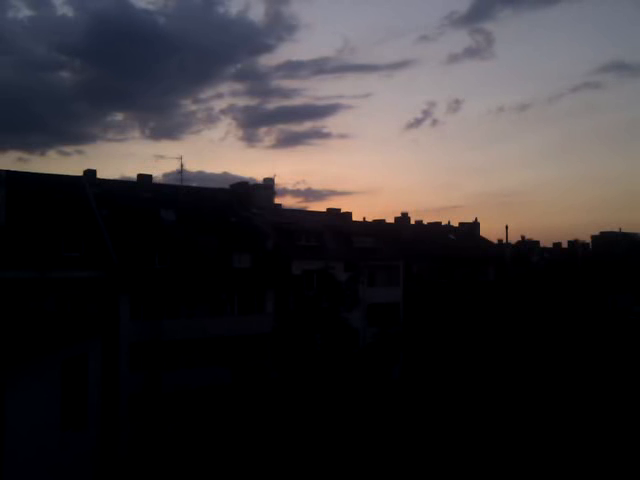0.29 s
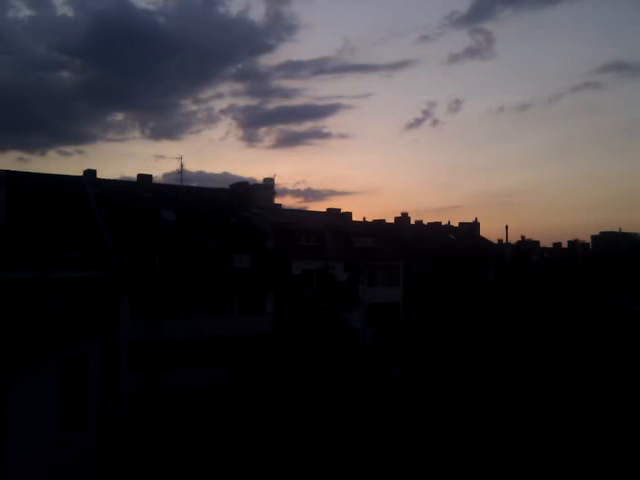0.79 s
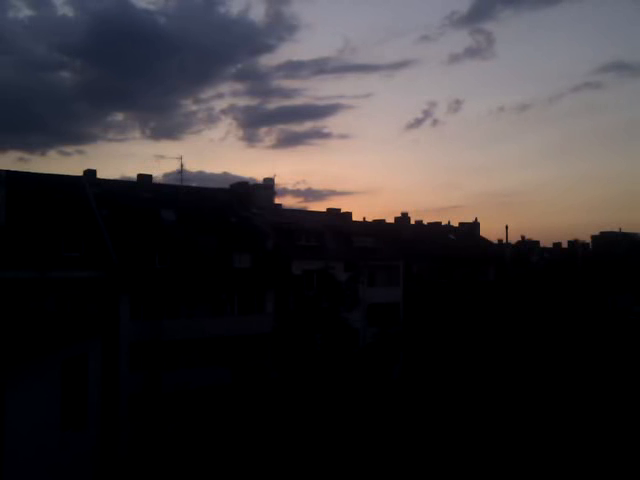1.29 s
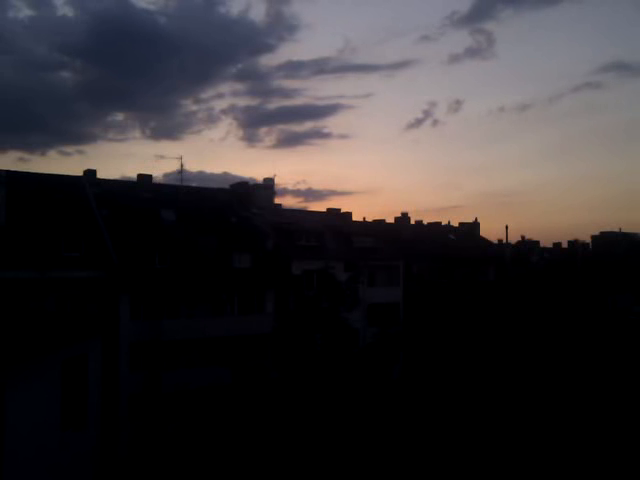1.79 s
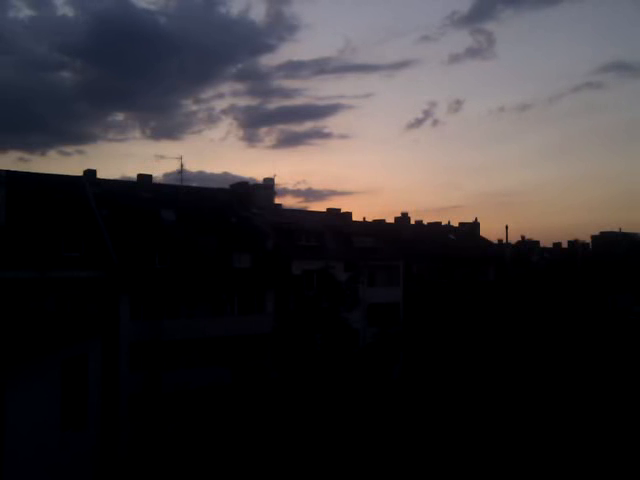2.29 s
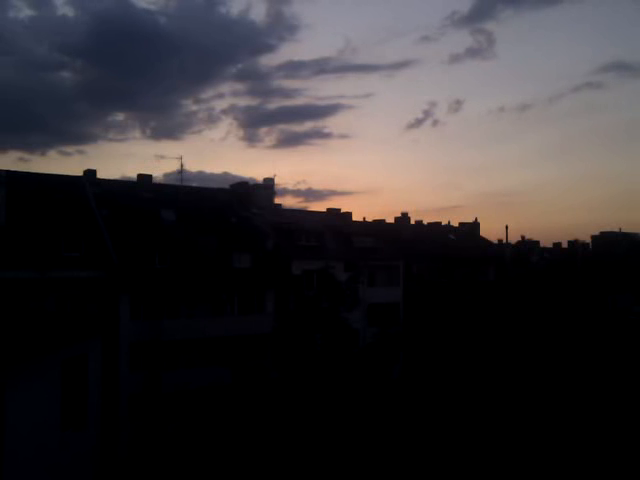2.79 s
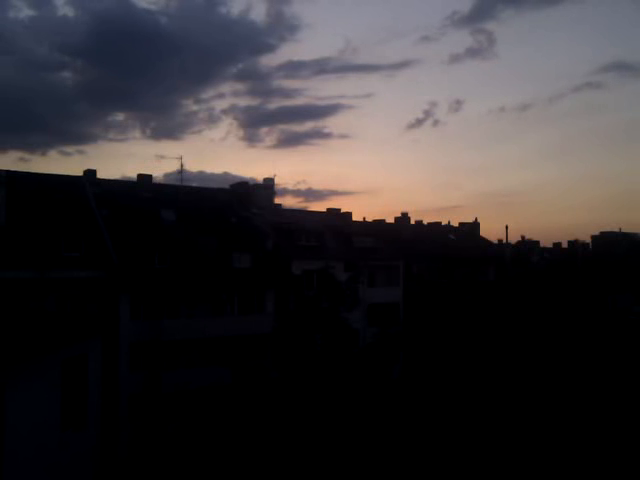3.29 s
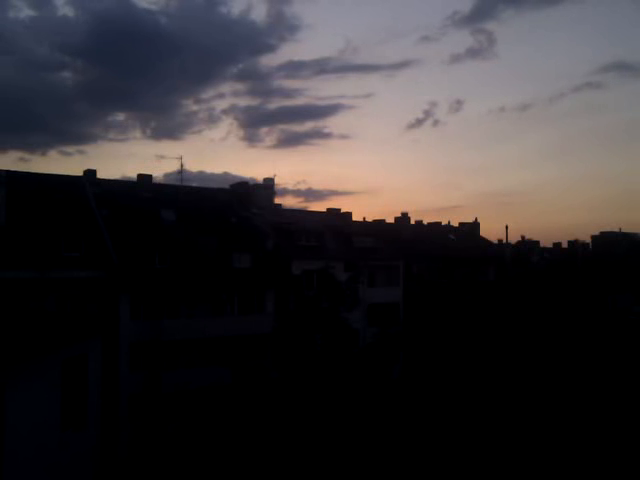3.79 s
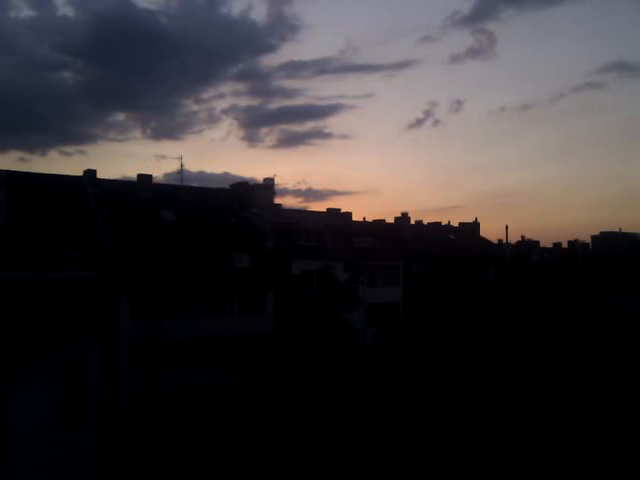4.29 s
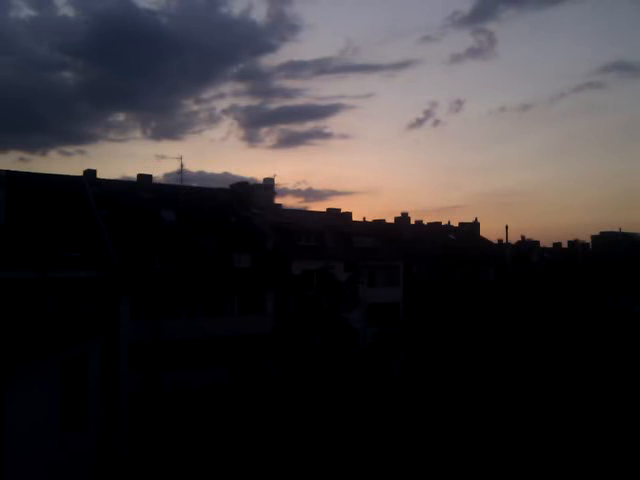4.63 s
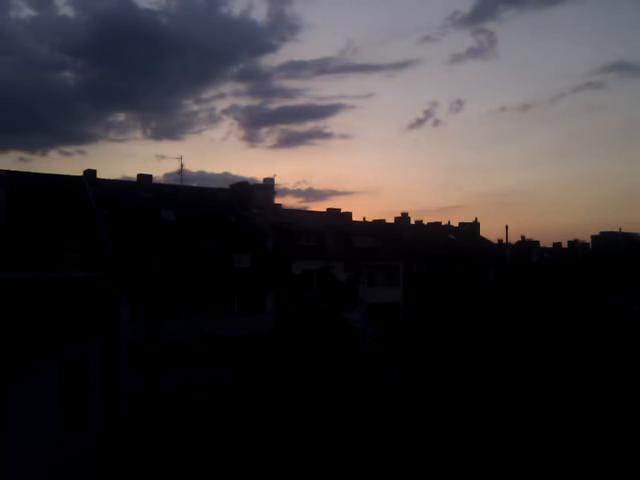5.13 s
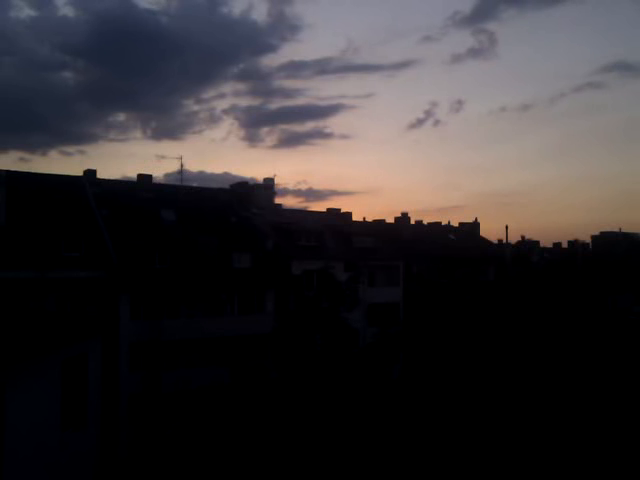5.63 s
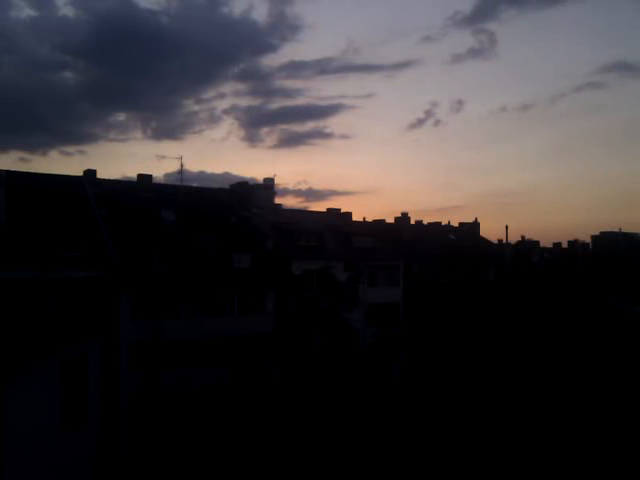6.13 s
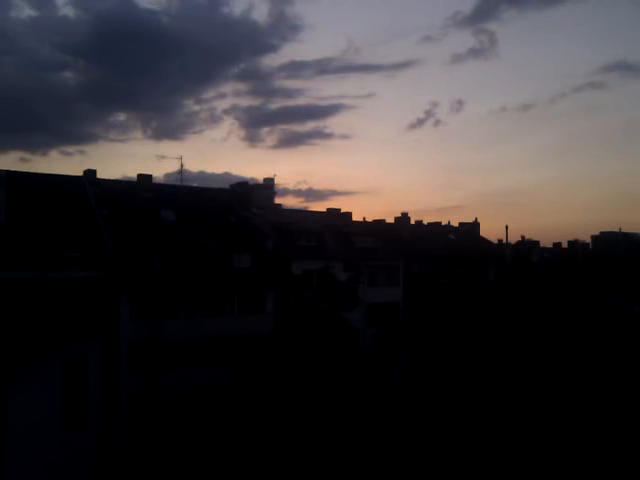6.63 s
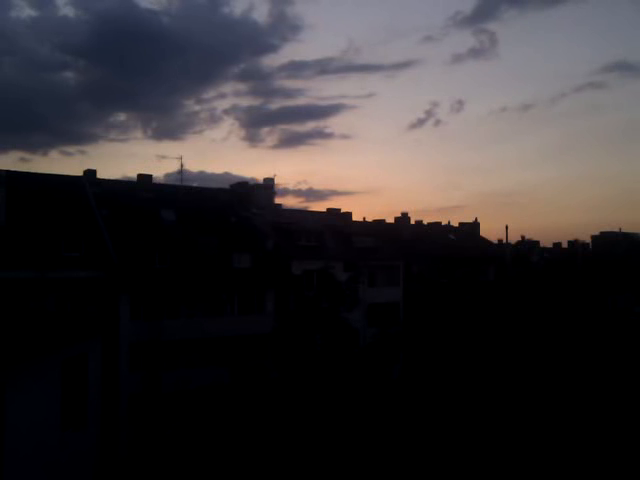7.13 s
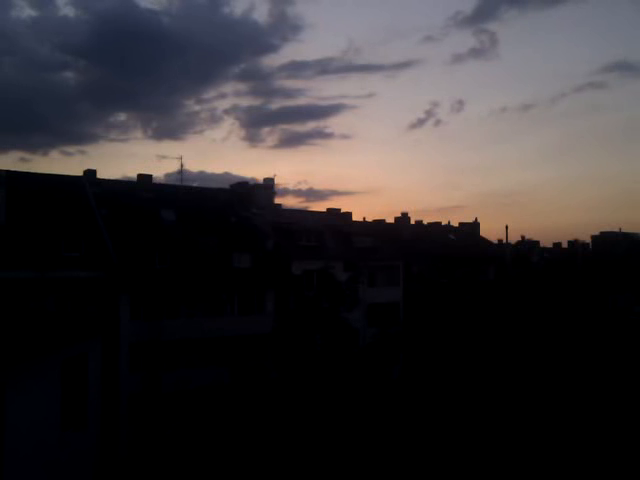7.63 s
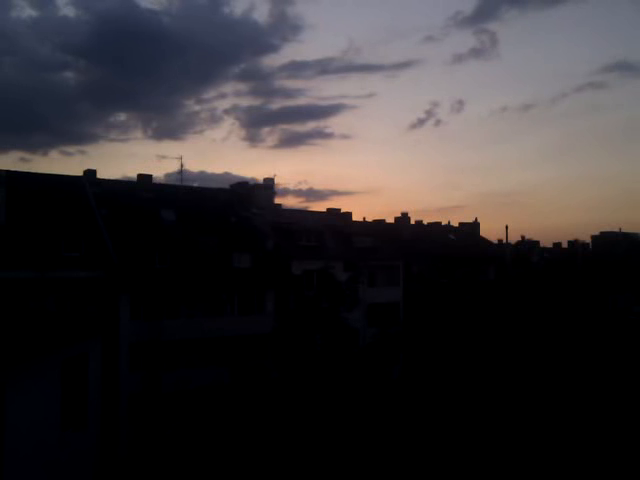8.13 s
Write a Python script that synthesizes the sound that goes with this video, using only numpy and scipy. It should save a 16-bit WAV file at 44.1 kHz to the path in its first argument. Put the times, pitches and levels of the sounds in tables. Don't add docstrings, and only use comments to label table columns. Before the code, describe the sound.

Outdoors at dusk, swifts give thin buzzing screams around a blackbird's whistles and twitters, echoing off houses above steady distant traffic.

```python
import sys
import numpy as np
from scipy import signal
from scipy.io import wavfile
from scipy.ndimage import uniform_filter1d, map_coordinates

SR = 44100
rng = np.random.default_rng(int(sys.argv[2]) if len(sys.argv) > 2 else 0)


def volts_from_decibels(level):
    exponent = np.asarray(level, float) / 20
    return 10 ** exponent


def master_out(mix):
    frames = np.transpose(np.atleast_2d(mix))
    ceiling = np.clip(frames, -1, 1)
    pcm = np.round(ceiling * 32767).astype(np.int16)
    wavfile.write(sys.argv[1], SR, pcm)


N = 369558

# start_s, length_s, first_pitch_hz, last_pitch_hz, top_level_db
FLUTE_NOTES = [(.203, 0.1, 1878, 1674, -40.5), (0.581, 0.055, 2866, 2520, -37.5),
               (4.487, .047, 2180, 2005, -45), (4.623, 0.082, 2800, 3055, -59),
               (4.965, .043, 2100, 2274, -34.5), (5.011, .03, 2227, 2247, -35),
               (5.163, .05, 4090, 5590, -40), (5.19, 0.062, 2037, 1940, -36),
               (5.241, 0.037, 1950, 1810, -36.5), (5.655, 0.071, 2508, 2520, -38.5),
               (5.711, 0.064, 2420, 2428, -28), (5.801, .033, 2316, 2192, -34),
               (5.839, 0.061, 2163, 2217, -32.5), (6.179, 0.037, 3964, 3770, -39),
               (6.812, 0.072, 7660, 7500, -56.5)]
SWELL_NOTES = [(.322, .122, 2110, 2260, -28.5), (1.205, .062, 2900, 3490, -39),
               (1.385, .046, 3020, 3430, -41), (2.795, .025, 4870, 6050, -45),
               (2.845, .017, 4810, 5600, -48), (2.9, .015, 4900, 5600, -55), (4.405, .055, 2250, 2430, -47),
               (4.858, .095, 3200, 2760, -37), (5.02, .038, 4600, 5900, -21),
               (6.697, .031, 4470, 7470, -40)]
HOOK_NOTES = [(1.288, .03, 2530, 5900, -43), (1.296, .024, 3680, 4950, -50), (1.457, .025, 2940, 5850, -53),
              (1.466, .021, 3840, 4900, -57), (4.46, .028, 1750, 2250, -52), (4.555, .018, 3480, 5400, -39),
              (4.582, .02, 3880, 5400, -45), (4.956, .014, 1800, 2170, -46), (6.715, .045, 2370, 5450, -50)]
FADE_NOTES = [
    (0, .13, 2160, 2060, -49),
    (0.627, .075, 2450, 2313, -34.5),
    (.874, .012, 7300, 6450, -38),
    (4.444, .016, 2500, 3300, -45),
    (6.956, 0.033, 7520, 5400, -38),
]
DIVE_NOTES = [
    (4.35, .014, 5600, 4800, -36),
    (6.19, .034, 7800, 3520, -35),
    (6.207, .011, 3880, 2670, -38),
    (6.39, .01, 7300, 6280, -39),
    (6.79, .01, 6140, 7500, -50),
]
TRILLS = {"drop": [(.134, .075, 2450, 2350, -45), (.493, .105, 2400, 2520, -39.5)],
          "vee": [(.8905, .262, 6900, 6600, -31.5), (.8915, .13, 5250, 5150, -40)],
          "rasp": [(4.633, .187, 2420, 2080, -38.5)], "buzz": [(6.227, .048, 3250, 3850, -36),
          (6.265, .075, 3850, 3200, -36)], "arch": [(5.273, .221, 1800, 1800, -35)],
          "quaver": [(5.495, .08, 2030, 2340, -33), (5.572, .078, 2370, 2430, -32)],
          "flick": [(6.41, .168, 6500, 6400, -37.5)]}
TRILL_TURNS = {"drop": [(0, .16, -9), (.13, .2, -3), (.28, .12, -4), (.36, -.04, -5), (.5, -.2, 0),
               (.62, -.1, -4), (.85, -.03, -5), (1, .16, -18)], "vee": [(0, .1, -19), (.2, .05, -4),
               (.5, -.05, 0), (.72, 0, -8), (1, .1, -19)], "quaver": [(0, -.005, -7), (.5, 0, 0),
               (1, -.005, -7)], "rasp": [(0, .06, -8), (.5, -.03, 0), (1, .06, -8)], "buzz": [(0, .2, -9),
               (.35, .04, -2), (.55, -.04, 0), (.75, .06, -5), (1, .2, -9)], "arch": [(0, -.06, -24),
               (.2, -.03, -6), (.5, .025, 0), (.75, -.01, -4), (.88, -.03, -24), (1, -.06, -34)],
               "flick": [(0, -.08, -14), (.15, -.02, -2), (.38, .02, 0), (.42, .17, -10), (.5, .02, -10),
               (.58, -.18, -20), (.62, -.18, -34), (1, -.08, -34)]}
TRILL_BEATS = {"drop": (38.5, 42.5, .02, .5), "vee": (79.5, 79, .015, .2), "rasp": (125, 125, .3, .4),
               "buzz": (125, 125, .12, .4), "arch": (35.5, 28, .01, .1), "quaver": (45, 80, .2, .1),
               "flick": (41.3, 41.3, .01, .4)}
OVERTONES_DB = (-29, -27)
# delay_s, level_db
ROOF_ECHO = (.0042, -8)
GESTURES = {"flute": (1.5, .5, 11, 7), "swell": (1.2, .8, 17, 5), "hook": (3.4, .2, 8, 9),
            "fade": (2, .15, 3, 13), "dive": (.45, .45, 13, 7), "thin": (2.5, .12, 5, 9),
            "trill": (1.1, .3, 4, 6), "hoarse": (1.8, .45, 11, 11), "motor": (1.1, .55, 4, 4)}

# time_s, pitch_hz, level_db
NEAR_SCREAMS = [
    [(.012, 5980, -62), (.048, 6390, -49.5), (.166, 6650, -42), (.33, 6400, -49.5)],
    [(.335, 5180, -40.5), (.41, 4730, -43.5), (.45, 4450, -51.5), (.48, 4320, -62.5)],
    [(2.815, 5960, -40), (2.935, 6080, -36), (3.141, 6200, -42.5), (3.347, 5950, -51), (3.53, 5980, -64)],
    [(4.0, 5450, -48.5), (4.066, 5780, -37), (4.216, 5980, -37.5), (4.342, 5856, -36), (4.4, 5710, -50.5),
     (4.53, 5810, -50)],
    [(4.57, 5380, -34), (4.646, 5835, -25.5), (4.762, 6223, -22.5), (4.818, 6320, -22.5), (4.87, 6200, -32),
     (5.0, 6230, -36.5)],
    [(4.8, 6460, -28), (4.884, 6633, -29), (5.3, 6576, -45)],
    [(5.055, 5840, -17), (5.107, 5940, -25), (5.19, 6000, -31), (5.253, 5917, -31.5), (5.77, 6070, -60.5)],
]
# first_swing_hz, last_swing_hz
NEAR_SWINGS = [(120, 700), (190, 380), (130, 480), (150, 600), (30, 280), (60, 350), (70, 600)]
# start_s, length_s, first_pitch_hz, last_pitch_hz, top_level_db
THIN_SCREAMS = [
    (0, 0.023, 5380, 5480, -44.5),
    (1.541, .455, 5740, 6270, -59),
    (1.907, 0.38, 5910, 5940, -58),
    (3.533, .43, 6050, 5840, -56),
    (6.578, 0.38, 6120, 6050, -53.5),
    (7.003, .36, 5660, 5560, -60),
]
HOARSE_SCREAMS = [
    (.19, .14, 5440, 5690, -42.5),
    (2.24, .41, 6190, 5930, -55),
    (2.659, 0.15, 5940, 5930, -54.5),
    (4.2, .2, 6910, 6770, -53.5),
    (6.046, 0.38, 4930, 5800, -49.5),
    (6.749, .19, 5380, 5390, -52.5),
    (7.33, .45, 5290, 5375, -57.5),
    (7.7, .62, 5370, 5310, -63),
]
FAR_SWINGS = {"thin": (55, 150), "hoarse": (200, 300)}
# first_rate_hz, last_rate_hz
FLUTTER_HZ = (280.5, 148.9)
# start_s, length_s, echo_delay_s, echo_db
WALL_ECHO = (4.57, .25, .024, -5)

# frequency_hz, t60_s
YARD_DECAY = [(1500, 1.55), (3000, 1.84), (7000, 1.4)]
# frequency_hz, level_db (per Hz)
CITY_SPECTRUM = [(30, -9), (48, -5.5), (300, -4), (1250, -19.5), (2000, -25), (5000, -29), (6710, -23.5),
                 (6900, -29.5)]
# time_s, level_db
TRAFFIC = [
    (0, -49),
    (.4, -46.5),
    (1.85, -49),
    (2.448, -45.5),
    (3.17, -45.5),
    (3.9, -49),
    (4.35, -48.5),
    (5.089, -43.5),
    (6.65, -45.5),
    (8.38, -47.5),
]
# start_s, length_s, first_pitch_hz, last_pitch_hz, top_level_db
MOTORS = [
    (2.6, 6.58, 1424, 1190, -67),
    (0, 1.6, 269, 273, -52.5),
    (1.95, 3, 268, 266, -60.5),
    (0, 3, 165, 161, -56.5),
    (3, 5.38, 166, 167, -58),
    (4.5, 2.2, 91, 75, -54),
    (7, 1.5, 97, 100, -55),
]
# time_s, centre_hz, width_hz, level_db
RUSTLE = (2.425, 1700, 2200, -54.5)


def evened(x):
    return x / np.sqrt(np.mean(x ** 2) + 1e-20)


def read(points, hz):
    f, value = np.transpose(points)
    return np.interp(np.log(hz + 1), np.log(f + 1), value)


def add(mix, s, sound):
    part = mix[max(round(s * SR), 0):][:len(sound)]
    part += sound[:len(part)]


def unroll(rows):
    s, *columns = np.transpose(rows)
    t = np.arange(s[0], s[-1], 1 / SR)
    return s[0], [np.interp(t, s, c) for c in columns]


def drift(count, hz):
    knots = rng.standard_normal(int(count * hz / SR) + 3)
    return map_coordinates(knots, [np.arange(count) * hz / SR], order=3)


def gesture(kind, start, length, hz0, hz1, db):
    bend, top, first_db, last_db = GESTURES[kind]
    on = np.linspace(0, 1, round(length * SR))
    top = np.clip(top, .05, .95)
    climb_db = first_db * np.maximum(1 - on / top, 0) ** 2
    sink_db = last_db * (np.maximum(on - top, 0) / (1 - top)) ** 2
    pitch = hz1 + (hz0 - hz1) * (1 - on) ** bend
    return start, (pitch, db - (climb_db + sink_db))


def whistle(hz, db, fade=.0035):
    phase = 2 * np.pi * np.cumsum(hz) / SR
    tone = np.sin(phase)
    for k, over_db in zip((2, 3), OVERTONES_DB):
        bright = (k * hz / 7000) ** 3.5 * (k * hz < 9000)
        tone = tone + volts_from_decibels(over_db) * bright * np.sin(k * phase)
    ends = signal.windows.tukey(len(hz), min(1, 2 * fade * SR / len(hz)))
    return np.sqrt(2) * volts_from_decibels(db) * tone * ends


def trill(shape, row):
    part, shift, turn_db = np.transpose(TRILL_TURNS[shape])
    first_rate, rate, uneven, hoarse = TRILL_BEATS[shape]
    s, (hz, db) = gesture("trill", *row)
    count = len(hz)
    beat = np.linspace(first_rate, rate, count) * (1 + uneven * drift(count, rate))
    turn = np.cumsum(beat) / SR % 1
    bend = uniform_filter1d(np.interp(turn, part, shift), 30) + .011 * drift(count, 3 * rate)
    puff_db = uniform_filter1d(np.interp(turn, part, turn_db), 20) + 2.5 * drift(count, 3 * rate)
    grit = evened(1 - hoarse + hoarse * drift(count, 500))
    return s, whistle(hz * (1 + bend), db + puff_db, .006) * grit


def blackbird():
    out = np.zeros(N)
    song = {"flute": FLUTE_NOTES, "swell": SWELL_NOTES, "hook": HOOK_NOTES,
            "fade": FADE_NOTES, "dive": DIVE_NOTES}
    for kind, notes in song.items():
        for row in notes:
            s, (hz, db) = gesture(kind, *row)
            add(out, s, whistle(hz, db + 2.2 * drift(len(hz), 70), .005))
    delay, echo_db = ROOF_ECHO
    for shape, trills in TRILLS.items():
        for row in trills:
            s, strokes = trill(shape, row)
            add(out, s, strokes)
            add(out, s + delay, volts_from_decibels(echo_db) * strokes)
    return out


def scream(hz, db, clear, harsh, waver_db):
    count = len(hz)
    on = np.linspace(0, 1, count)
    rate = np.geomspace(*FLUTTER_HZ, count) * (1 + (.1 + .25 * on) * drift(count, 110))
    flutter = 2 * np.pi * np.cumsum(rate) / SR
    swing = clear + (harsh - clear) * on ** 1.336
    hz = uniform_filter1d(hz, 600) + swing * (np.sin(flutter) + .27 * drift(count, 160))
    throb = 1 + np.clip(swing / 600, 0, 1) * np.cos(flutter + .26)
    throb = throb + (.053 + .3 * on) * drift(count, 1600)
    db = db + 1.8 * drift(count, 70) + waver_db * drift(count, 18)
    return whistle(hz, db, .0067) * evened(throb)


def swifts():
    out = np.zeros(N)
    for rows, swing in zip(NEAR_SCREAMS, NEAR_SWINGS):
        s, (hz, db) = unroll(rows)
        add(out, s, scream(hz, db, *swing, waver_db=0))
    for kind, rows, waver_db in (("thin", THIN_SCREAMS, 4), ("hoarse", HOARSE_SCREAMS, 0)):
        for row in rows:
            s, (hz, db) = gesture(kind, *row)
            add(out, s, scream(hz, db, *FAR_SWINGS[kind], waver_db))
    return out


def skim_wall(flock):
    s, length, delay, db = WALL_ECHO
    skim = flock[round(s * SR):][:round(length * SR)]
    add(flock, s + delay, volts_from_decibels(db) * skim * signal.windows.tukey(len(skim), .5))


def yard(x, early_db, treble_db):
    taps = np.zeros(SR)
    at = np.arange(700, SR - 20, 20)
    taps[at + rng.integers(0, 20, len(at))] = rng.choice([-1., 1.], len(at))
    hz, t, z = signal.stft(taps, SR, nperseg=256)
    hz = hz[:, None]
    decay_db = -60 * t / read(YARD_DECAY, hz)
    tail = signal.istft(z * volts_from_decibels(decay_db + treble_db * (hz > 2950)), SR, nperseg=256)[1]
    tail /= np.linalg.norm(tail) / volts_from_decibels(treble_db * .6)
    tail[rng.integers(300, 4000, 8)] += volts_from_decibels(early_db)
    return signal.fftconvolve(x, tail)[:N]


def traffic():
    size, hop = 2048, 512
    frames, hz = N // hop + 5, np.fft.rfftfreq(size, 1 / SR)
    a, b, patches = rng.standard_normal((frames, 1025, 3)).T
    patches = evened(uniform_filter1d(uniform_filter1d(patches, 14, 0), 8, 1))
    s, level_db = np.transpose(TRAFFIC)
    t = np.arange(frames) * hop / SR
    hz = hz[:, None]
    swell = np.interp(t, s, level_db - level_db.mean()) / (1 + (hz / 1500) ** 2)
    deep = (.6 * swell[0] + 1.2 * drift(frames, 1.2 * hop)) / (1 + (hz / 110) ** 4)
    colour_db = read(CITY_SPECTRUM, np.minimum(hz, 6900))
    z = (a + 1j * b) * volts_from_decibels(colour_db + 1.2 * patches - 14 * (hz < 38))
    scale = np.std(signal.istft(z, nperseg=size, noverlap=size - hop)[1])
    rumble = signal.istft(z * volts_from_decibels(swell + deep), nperseg=size, noverlap=size - hop)[1][:N]
    return volts_from_decibels(-47.5) / scale * rumble


def motors():
    out = np.zeros(N)
    for row in MOTORS:
        s, (hz, db) = gesture("motor", *row)
        add(out, s, whistle(hz * (1 + .035 * drift(len(db), 40)), db + 2.4 * drift(len(db), 8)))
    return out


def rustle():
    s, hz, width, db = RUSTLE
    band = signal.butter(2, [hz - width / 2, hz + width / 2], "band", fs=SR)
    noise = evened(signal.lfilter(*band, rng.standard_normal(N)))
    return volts_from_decibels(db) * noise * np.exp(-((np.arange(N) / SR - s) / .05) ** 2)


def scene():
    bird, flock = blackbird(), swifts()
    skim_wall(flock)
    blur = .6 + .8 * drift(N, 200)
    echoes = volts_from_decibels(-9.5) * yard(bird * blur, -16, -5)
    echoes = echoes + volts_from_decibels(-7) * yard(flock * blur, -8.5, 0)
    mono = bird + flock + echoes + traffic() + motors() + rustle()
    return np.array([mono, mono])


def low_pass(x):
    return signal.sosfilt(signal.butter(12, 8150, fs=SR, output="sos"), x)


def record(dry):
    hz, t, z = signal.stft(dry[0], SR, nperseg=2048)
    power = abs(z) ** 2
    band = np.arange(len(hz)) // 6
    band_hz = hz[band * 6][:, None]
    loud_db = 10 * np.log10(power[hz > 4500].sum(0) + 1e-12) + 55
    hz = hz[:, None]

    spread = uniform_filter1d(uniform_filter1d(power, 70, 0), 70, 0) * (hz > 3500)
    z = z + volts_from_decibels(-20.5) * np.sqrt(abs(spread)) * np.exp(2j * np.pi * rng.random(z.shape))

    luck = uniform_filter1d(rng.standard_normal((len(t), band[-1] + 1)), 2, 0).T[band]
    edge_hz = np.minimum(7620 - 11 * loud_db + 230 * luck, 8050)
    hole = (abs(hz - 4550) < 260) & (luck + .05 * np.minimum(loud_db, 15) > 1.3)
    dull_db = -.016 * np.maximum(hz - 7150, 0)
    kept = volts_from_decibels(dull_db - 70 * (band_hz > edge_hz) - 31 * hole)

    local = abs(uniform_filter1d(power, 8, 0)) + 1e-20
    calm = np.median(local, 1)[:, None]
    side = volts_from_decibels(-17) * np.sqrt(local) * (calm / local) ** .2 * (hz ** 2 / (hz ** 2 + 150 ** 2))
    side = side * np.exp(2j * np.pi * rng.random(z.shape))

    mono, grit = signal.istft(np.array([z, side]) * kept, SR, nperseg=2048)[1][:, :N]
    offset = -.0163
    mix = np.array([mono + grit, mono - grit]) + offset
    return low_pass(mix)


dry = scene()
out = record(dry)
master_out(out)
```